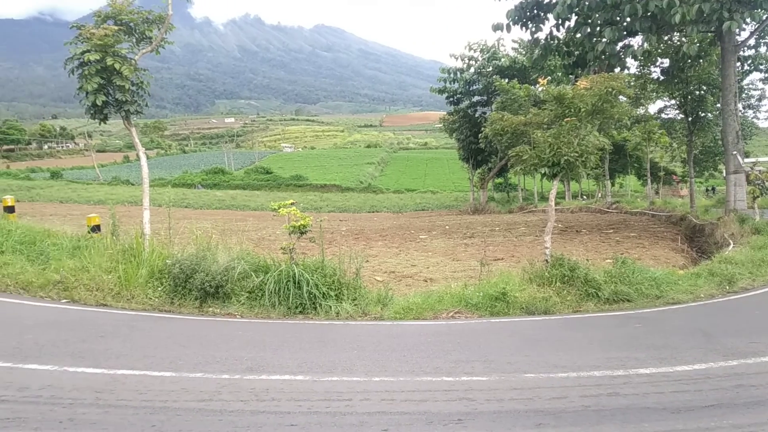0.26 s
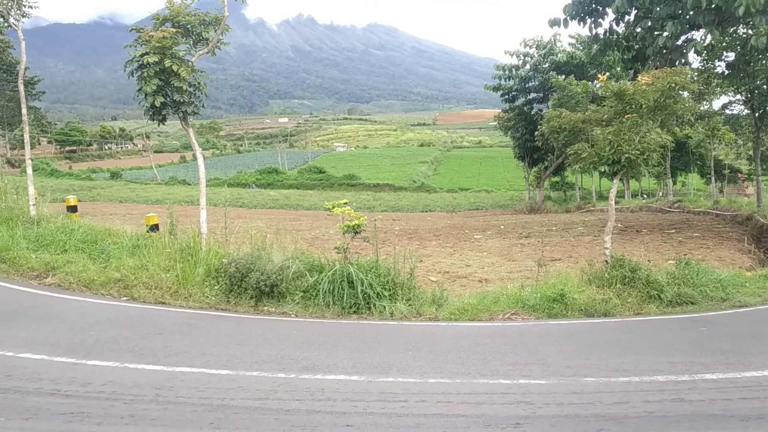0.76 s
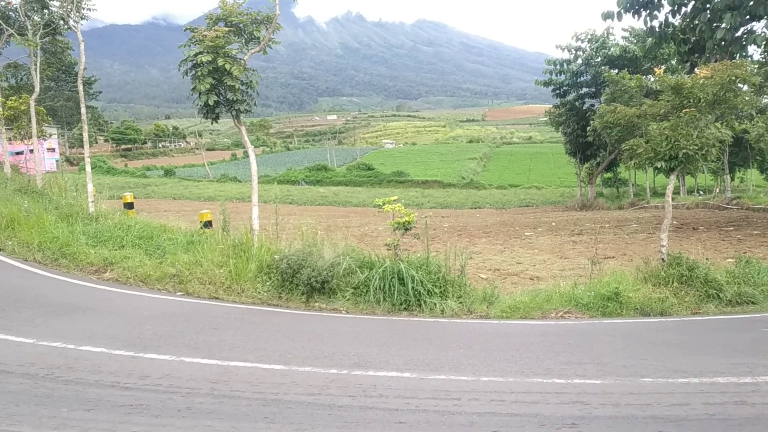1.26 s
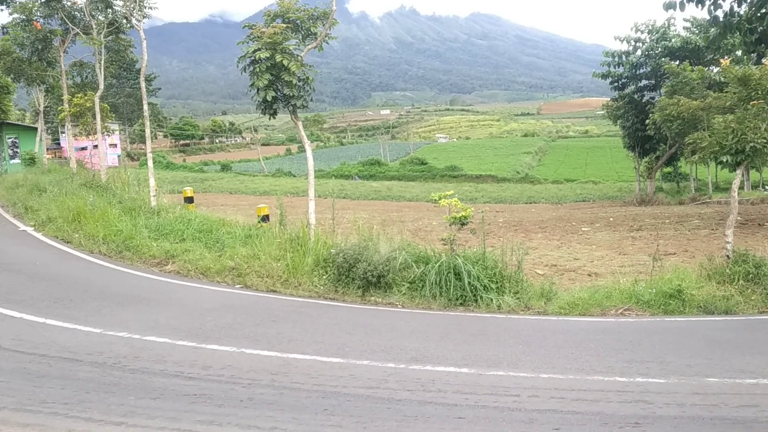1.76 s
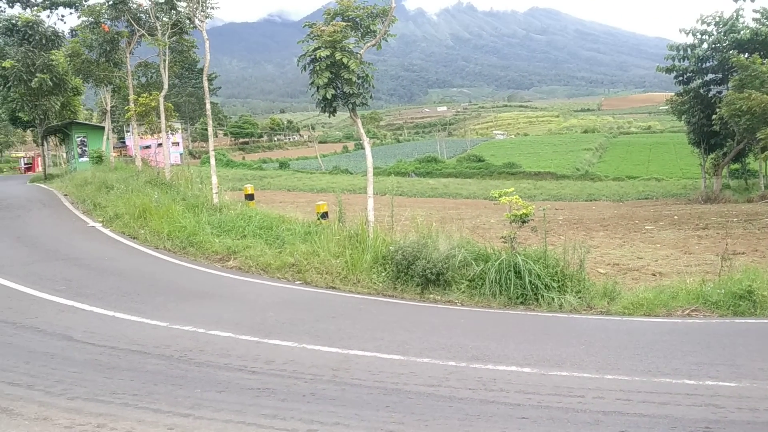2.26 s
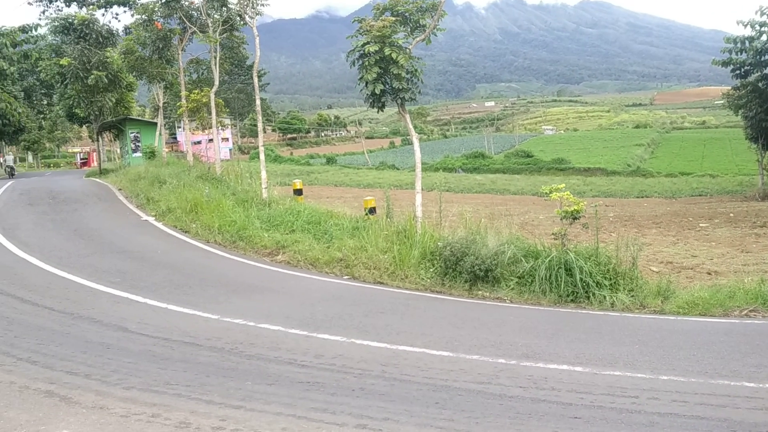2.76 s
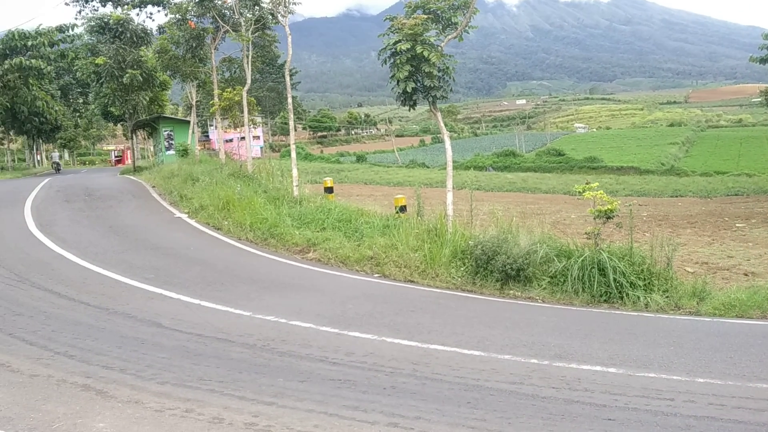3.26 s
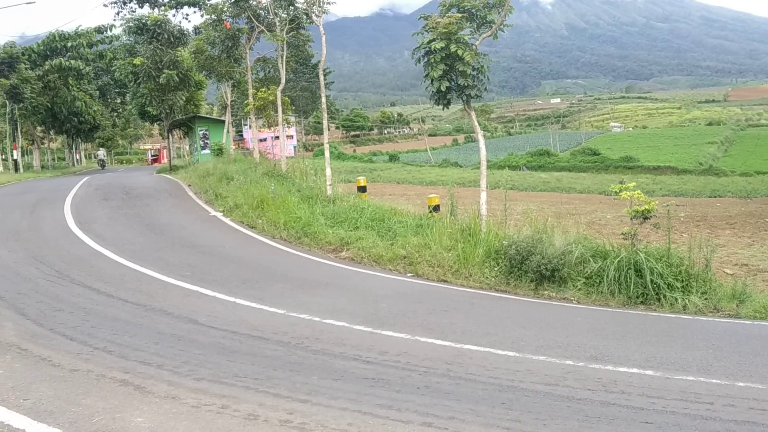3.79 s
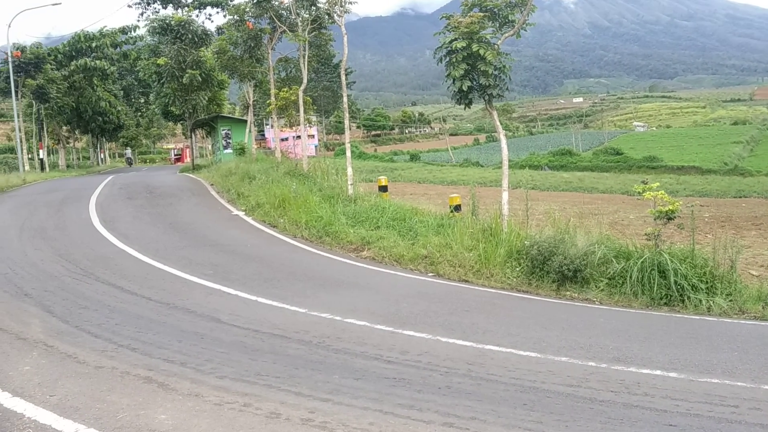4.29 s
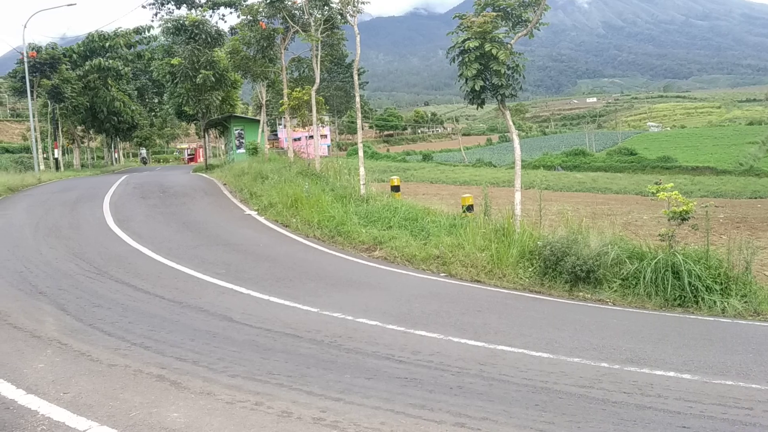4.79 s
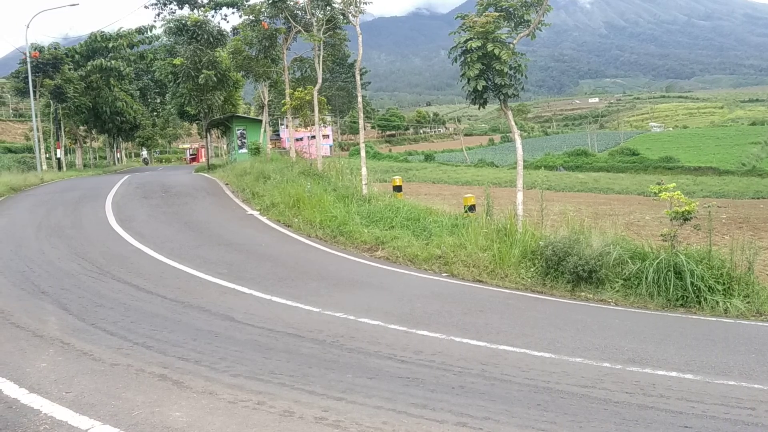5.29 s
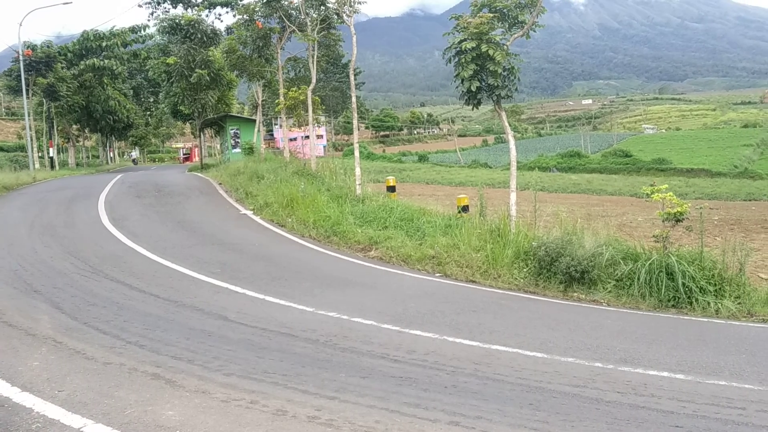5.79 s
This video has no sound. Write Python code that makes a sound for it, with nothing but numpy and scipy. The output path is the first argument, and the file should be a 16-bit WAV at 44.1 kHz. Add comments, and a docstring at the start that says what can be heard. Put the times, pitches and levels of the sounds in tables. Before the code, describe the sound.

A single-cylinder motorcycle putters away along a country road and fades, with light wind on the microphone and a bird chirping.

```python
"""A single-cylinder motorcycle has just passed on a country road. Every firing thumps through the
silencer, rings the tailpipe and spits a sharp crack of gas. Tyres and chain hiss, and a light breeze
rumbles on the microphone. The bike pulls gently away round a bend, its sharpest sounds fading first.
From about 2.4 s a bird in the roadside trees peeps twice, then sings its short phrase twice."""
import sys
import numpy as np
from scipy import signal
from scipy.fft import rfft, irfft
from scipy.io import wavfile
from scipy.ndimage import uniform_filter1d

SR = 44100
rng = np.random.default_rng(int(sys.argv[2]) if len(sys.argv) > 2 else 0)


def store_wav(level_fs):
    """Save 16-bit WAV to argv[1]."""
    pcm = np.round(np.clip(np.atleast_2d(level_fs), -1, 1) * 32767)
    wavfile.write(sys.argv[1], SR, pcm.T.astype(np.int16))


N = 266364
TIME_S = np.arange(N) / SR
SPECTRUM_HZ = np.maximum(np.arange(N // 2 + 1) * SR / N, 1)


def from_db(db):
    """Turn decibels into a number to multiply by."""
    return 10 ** (np.asarray(db) / 20)

def over_time(points):
    """Join (time_s, value) points with straight lines, one value per sample."""
    return np.interp(TIME_S, *np.transpose(points))

def over_pitch(points):
    """Join (pitch_hz, value) points across the spectrum, with octaves evenly spaced."""
    hz, values = np.transpose(points)
    return np.interp(np.log(SPECTRUM_HZ), np.log(hz), values)

def swell(peak_s, half_s):
    """A bell-shaped rise and fall of height 1."""
    return np.exp(-((TIME_S - peak_s) / half_s) ** 2)

def drift(rate_hz):
    """A smooth random wander, typically about 1 either side of zero."""
    step = 40  # samples between random points
    r = np.exp(-2 * np.pi * step * rate_hz / SR)
    slow = signal.lfilter([1], [1, -2 * r, r * r], rng.standard_normal(N // step + 2002))[2000:]
    return np.interp(np.arange(N) / step, np.arange(len(slow)), slow / slow.std())

def evened(x):
    """Hold the average level at 1, keeping the single pulses."""
    power = np.mean(np.atleast_2d(x) ** 2, axis=0)
    return x / np.sqrt(uniform_filter1d(uniform_filter1d(power, SR // 4), SR // 4) + 1e-20)

def coloured(spectrum, channels=2):
    """Separate noises at level 1, shaped by a spectrum and fading beyond its ends."""
    low_cut = np.minimum(SPECTRUM_HZ / spectrum[0][0], 1) ** 2
    high_cut = np.minimum(spectrum[-1][0] / SPECTRUM_HZ, 1) ** 2
    white = rfft(rng.standard_normal((channels, N)))
    noise = irfft(white * from_db(over_pitch(spectrum)) * low_cut * high_cut, N)
    return noise / noise.std()

def flickering(noise, depth_db, band_hz, count=5):
    """Neighbouring bands of pitch flicker separately, so the noise keeps changing colour."""
    band = (SPECTRUM_HZ // band_hz).astype(int) % count
    spectrum = rfft(noise)
    return sum(irfft(spectrum * (band == k), N) * from_db(depth_db * drift(37)) for k in range(count))

def delayed(x, seconds):
    """The same sound, arriving later."""
    return np.interp(np.arange(N) - seconds * SR, np.arange(N), x, left=0)

def stereo(x, lead_s, left_db):
    """Place a sound: it arrives lead_s sooner on the right and left_db louder on the left."""
    left = delayed(x, lead_s / 2) * from_db(left_db / 2)
    right = delayed(x, -lead_s / 2) * from_db(-left_db / 2)
    return np.array([left, right])

# How much sooner the bike's hiss and gas noise arrive on the right: time_s, lead_ms
RIGHT_LEAD = [(0, .48), (1.3, .45), (3.2, .33), (6.04, .31)]

def from_bike(x, left_db):
    """Make a sound come from the moving bike."""
    return stereo(x, over_time(RIGHT_LEAD) / 1000, left_db)

# How alike left and right are for sound from all round: pitch_hz, likeness (0 to 1)
STEREO_LIKENESS = [(100, 0.72), (300, 0.99), (650, 0.47), (1400, 0), (16000, 0)]

def all_round(pair):
    """Long, low waves reach left and right alike; short, high ones do not."""
    alike = np.clip(over_pitch(STEREO_LIKENESS), 0, 1)
    mid, side = rfft(pair)
    return irfft(np.sqrt((1 + alike) / 2) * mid + np.sqrt((1 - alike) / 2) * side * [[1], [-1]], N)

def countryside(x, fade_s):
    """Trees and banks scatter a thin, dull echo that drops 60 dB in fade_s."""
    age = np.arange(SR // 2) / SR
    scatter = rng.standard_normal((2, len(age))) * from_db(-60 * age / fade_s)
    scatter *= 1 - np.exp(-age / 0.0028)
    scatter /= np.sqrt(np.sum(scatter[0] ** 2))
    scatter = signal.sosfilt(signal.butter(1, 5000, fs=SR, output="sos"), scatter)
    return all_round(signal.fftconvolve(x, scatter, axes=1)[:, :N])

CLOSEST_M, SPEED_M_PER_S = 12.25, 9.2
DISTANCE_M = np.hypot(CLOSEST_M, SPEED_M_PER_S * TIME_S)

def receding(near_db, doubling_db, facing_db, facing_s):
    """A part fades with each doubling of distance, and swells as the bend turns it towards us."""
    doublings = np.log2(DISTANCE_M / CLOSEST_M)
    return from_db(near_db - doubling_db * doublings + facing_db * swell(facing_s, half_s=0.94))

# The bike turning its tail to us: time_s, share (0 = side on, 1 = from behind)
TAIL_TURN = [(0, 0), (1.7, 0.06), (2.8, 0.28), (3.3, 0.78), (3.9, 0.77), (4.6, 0.76), (6.04, 0.98)]

def turned():
    """How far the bike has turned away at each sample."""
    return np.clip(over_time(TAIL_TURN), 0, 1)

# The engine slowly speeding up: time_s, firings_per_s
ENGINE_SPEED = [(0, 30.17), (.33, 30.75), (.66, 31.13), (.995, 31.759), (1.758, 32.879), (2.969, 35.083),
                (3.473, 35.405), (4.742, 35.725), (5.649, 36.495), (6.04, 37.124)]

def firings(first_s, jitter_s):
    """The samples at which the exhaust valve opens, each a touch early or late."""
    cycles = np.cumsum(over_time(ENGINE_SPEED)) / SR
    cycles -= cycles[round(first_s * SR)]
    at = np.nonzero(np.diff(np.floor(cycles)))[0]
    jitter = np.round(rng.normal(0, 1, len(at)) * jitter_s * SR).astype(int)
    return np.clip(at + jitter, 0, N - 1)

def ringing(tones, at, force_db, uneven_db):
    """Each firing rings all the tones (wide ones die sooner); their balance shifts as the bike turns."""
    behind, out = turned()[at], np.zeros(N)
    for hz, width_hz, sign, side_db, behind_db in tones:
        heard = (1 - behind) * from_db(side_db) + behind * from_db(behind_db)
        pushes = np.zeros(N)
        pushes[at] = np.sign(sign) * heard * from_db(force_db + uneven_db * rng.standard_normal(len(at)))
        decay, angle = np.exp(-np.pi * width_hz / SR), 2 * np.pi * hz / SR
        out += signal.lfilter([0, np.sin(angle)], [1, -2 * decay * np.cos(angle), decay ** 2], pushes)
    return evened(out)

# Tones of the silencer's chambers: pitch_hz, width_hz, sign (push or pull), side_db, behind_db
SILENCER_TONES = [(114.4, 66.5, -1, -15.5, -39), (211.8, 49.4, 1, -11.5, -21), (230.5, 28.5, 1, -29, -14),
                  (244.7, 34, -1, -21.5, -31.5), (309.2, 31.7, 1, -21, -28.5), (334, 31, 1, -37, -47),
                  (371, 66, -1, -28.5, -33), (508, 48, -1, -34.5, -59)]

def silencer_thump(at, force):
    """The chambers boom; the road bank adds a dull echo that follows ever closer as the bike leaves."""
    thump = ringing(SILENCER_TONES, at, 0.43 * force, uneven_db=0.23)
    echo = delayed(thump, seconds=0.01482 * CLOSEST_M / DISTANCE_M)
    echo = signal.sosfilt(signal.butter(2, 420, fs=SR, output="sos"), echo)
    thump = evened(thump + 0.4 * swell(3.14, half_s=0.92) * echo)
    thump *= receding(near_db=-20.5, doubling_db=4.0, facing_db=2.0, facing_s=4.1)
    return stereo(thump, lead_s=0.00006, left_db=-1.5)

# Tones of the tailpipe: pitch_hz, width_hz, sign (push or pull), side_db, behind_db
TAILPIPE_TONES = [(636, 41.4, -1, -39.5, -36), (821, 180, 1, -53, -32.5), (884, 94, -1, -24.5, -20.5),
                  (965, 42, -1, -34.5, -42), (1077, 81, 1, -32.5, -37), (1327, 60, 1, -48, -40)]
# Their echoes off the bank and trees: delay_s, level_db
BARK_ECHOES = [(.0078, -36), (0.0205, -14)]

def tailpipe_bark(at, force, hard_db):
    """The pipe rings just after each thump, a little louder when the engine fires softly."""
    bark = delayed(ringing(TAILPIPE_TONES, at, 0.11 * force, uneven_db=1.4), seconds=0.00097)
    bark = evened(bark + sum(from_db(db) * delayed(bark, s) for s, db in BARK_ECHOES))
    bark *= receding(near_db=-39.5, doubling_db=2.5, facing_db=1.5, facing_s=3.96)
    alongside_db = -6 * swell(0, half_s=0.42)  # at first the pipe points past us
    return stereo(bark * from_db(alongside_db - 0.15 * hard_db), lead_s=0.000096, left_db=1.5)

def gas_bursts(spectrum, at, force_db, late_s, rise_s, snap_s, tail_s, tail_db, left_db):
    """A snap of rushing gas straight from the pipe, then a tail scattered off the road and verge."""
    pushes, age = np.zeros(N), np.arange(SR // 20) / SR
    pushes[at] = from_db(force_db)
    opening = (1 + np.tanh((age - late_s) / rise_s)) / 2
    open_s = np.maximum(age - late_s, 0)
    snap = signal.fftconvolve(pushes, opening * np.exp(-open_s / snap_s))[:N]
    tail = signal.fftconvolve(pushes, opening * np.exp(-open_s / tail_s))[:N] * from_db(tail_db)
    side = coloured([(hz, db) for hz, db, _ in spectrum], channels=3)
    behind = coloured([(hz, db) for hz, _, db in spectrum], channels=3)
    turn = turned()
    noise = flickering(np.sqrt(1 - turn) * side + np.sqrt(turn) * behind, depth_db=3.0, band_hz=1100)
    # half of the tail comes from the bike's direction, half from all round
    pair = from_bike(np.hypot(snap, tail) * noise[0], left_db=-1) + tail * noise[1:]
    balance_db = left_db * (1 - 1.4 * turn)  # slides from left to right
    return evened(pair * from_db([balance_db / 2, -balance_db / 2]))

# Colour of the gas noise in each firing: pitch_hz, side_db, behind_db
RASP_COLOUR = [(490, -9, -12), (960, 9, 3), (1580, -7, 10), (1780, -13, 9.5), (2077, 5.5, -7),
               (3080, -2.5, -2.5), (3310, 0, 9), (3540, -2, -19), (3900, -1, 8), (4320, -5.5, 1),
               (4230, 3.5, 2), (5180, -9, 1), (7000, -16, -6.5)]

def gas_rasp(at, force, hard_db):
    """Each firing blows out a rough puff, a little louder when the engine fires hard."""
    rasp = gas_bursts(RASP_COLOUR, at, 0.44 * force, late_s=0.0013, rise_s=0.00048,
                      snap_s=0.0013, tail_s=0.0068, tail_db=-9.5, left_db=1.6)
    rasp *= receding(near_db=-34.0, doubling_db=9.0, facing_db=7.0, facing_s=4.23)
    return rasp * from_db(0.16 * hard_db)

# Colour of the sharp edge of each firing: pitch_hz, side_db, behind_db
CRACK_COLOUR = [(3000, -53, -18), (4870, -15.5, -4), (6320, 2.5, -4.5), (8050, 2, 9), (8300, 1.5, -25),
                (10300, 3.5, 4), (12200, -6, -10.5), (14300, -6, -32), (15700, -18, -30)]

def gas_crack(at, force, hard_db):
    """The sudden jet of gas makes a bright crack that fades fast with distance."""
    crack = gas_bursts(CRACK_COLOUR, at, 0.38 * force, late_s=0.0014, rise_s=0.00012,
                       snap_s=0.0003, tail_s=0.0029, tail_db=20, left_db=4.5)
    crack *= receding(near_db=-27.0, doubling_db=14.0, facing_db=5.5, facing_s=3.73)
    return crack * from_db(hard_db)

# Spells of harder (+) or softer (-) firing: time_s, crack_change_db
FIRING_SPELLS = [(.14, 0.5), (.42, -3.5), (1.17, -3), (1.65, -2.5), (2.42, 2.5), (2.9, -4), (4.1, -11.5),
                 (4.62, 4), (5.25, -8)]

def exhaust():
    """The same firings drive thump, bark, rasp and crack; a few spits and a faint echo join them."""
    hard_db = sum(db * swell(s, half_s=0.16) for s, db in FIRING_SPELLS)
    at = firings(first_s=0.0096, jitter_s=0.00008)
    force = rng.standard_normal(len(at))  # no two firings are equally strong
    direct = silencer_thump(at, force) + tailpipe_bark(at, force, hard_db)
    direct += gas_rasp(at, force, hard_db) + gas_crack(at, force, hard_db)
    direct += gas_spits(width_hz=360, fall_s=0.00076)
    return direct + from_db(-17) * countryside(direct, fade_s=0.4)

# Colour of the chain and tread noise: pitch_hz, level_db
HISS_COLOUR = [(3500, -57), (5300, -20), (6500, 3.5), (8400, 4), (10800, 2), (12500, -13), (15000, -37)]

def chain_hiss():
    """The chain and tyre tread make a high, flickering hiss."""
    noise = flickering(coloured(HISS_COLOUR, channels=3), depth_db=3.5, band_hz=700)
    hiss = evened(from_bike(noise[0], left_db=12.5) + noise[1:]) * from_db(0.78 * drift(17))
    return hiss * receding(near_db=-36.5, doubling_db=8.5, facing_db=2.5, facing_s=3.3)

# Colour of the rolling tyres: pitch_hz, level_db
ROAR_COLOUR = [(100, 8.5), (300, 12), (550, 7.5), (900, 10.5), (1500, 2.5), (2250, 8), (3200, 2),
               (4500, 1.5), (6000, 0.5), (9000, -9.5)]

def tyre_roar():
    """Tyres on asphalt make a broad, uneven roar."""
    roar = from_db(2.5 * drift(26.6)) * all_round(coloured(ROAR_COLOUR))
    return roar * receding(near_db=-39.5, doubling_db=4.0, facing_db=3.5, facing_s=3.3)

# Colour of the breeze: pitch_hz, level_db
BREEZE_COLOUR = [(12, -4), (40, -3.5), (80, -5), (150, -9), (300, -15), (600, -31.5), (1500, -78)]
# Its rise and fall: time_s, level_db
BREEZE_LEVEL = [(0, -22), (1.0, -28), (2.3, -30.5), (2.7, -35), (3.6, -33), (4.0, -45.5), (5.3, -42),
                (6.04, -27.5)]

def breeze():
    """Air on the microphone makes a lumpy rumble, only partly shared by left and right."""
    air = coloured(BREEZE_COLOUR, channels=3)
    rumble = evened(0.44 * air[0] + 1.03 * air[1:])
    return rumble * from_db(over_time(BREEZE_LEVEL) + 2.0 * drift(6.4))

# The sharpest spits of gas: start_s, peak_db, pitch_hz
GAS_SPITS = [(0.078, -8, 6800), (0.1755, -9.5, 10300), (0.241, -5.5, 11900), (0.2737, -6.5, 7000),
             (0.4377, -12, 5640), (0.5656, -16, 7240), (0.6305, -16, 4670), (0.7267, -12, 8850),
             (0.7604, -4, 7650), (4.063, -32, 3900)]

def gas_spits(width_hz, fall_s):
    """Now and then the exhaust jet chirps for a moment at one pitch."""
    out, age = np.zeros(N), np.arange(SR // 50) / SR
    for start_s, db, hz in GAS_SPITS:
        puff = rng.standard_normal(len(age)) * np.exp(-age / fall_s)
        ring = signal.lfilter(*signal.iirpeak(hz, hz / width_hz, fs=SR), puff)
        first = int(start_s * SR)
        out[first:first + len(age)] += from_db(db) * ring / np.abs(ring).max()
    return from_bike(out, left_db=4)

# Short puffs of wind: peak_s, half_length_s, level_db
WIND_PUFFS = [(0.832, 0.04, -21), (5.896, 0.044, -30.5)]
# Their colour: pitch_hz, level_db
PUFF_COLOUR = [(60, -6), (160, 14), (320, -30), (600, -14), (1200, -25)]

def wind_puffs():
    """Air bumps the microphone briefly, higher in pitch than the rumble."""
    push = sum(from_db(db) * swell(s, half_s) for s, half_s, db in WIND_PUFFS)
    return push * coloured(PUFF_COLOUR)

# Single peeps before the song: start_s, level_db
BIRD_PEEPS = [(2.41, -43.5), (2.645, -48)]
# Notes of the phrase: after_s, length_s, start_hz, middle_hz, end_hz, level_db
BIRD_PHRASE = [(0, 0.036, 3220, 3720, 3180, -6), (0.12, 0.0306, 3340, 3000, 2780, -8.5),
               (0.201, .056, 2500, 2620, 2130, -2), (.255, 0.059, 2106, 2250, 2130, -8.5)]
# Each time it is sung: start_s, level_db, stretch (above 1 is slower)
BIRD_SONGS = [(3.68, -40.5, .94), (5.701, -42.5, 1.02)]

def bird():
    """Two peeps, then one phrase twice: short sliding whistles with a rough edge, blurred by trees."""
    peep_s, peep_hz = 0.032, (2380, 2325, 2270)
    notes = [(s, peep_s, *peep_hz, db) for s, db in BIRD_PEEPS]
    for start_s, song_db, stretch in BIRD_SONGS:
        for after_s, length_s, *slide_hz, db in BIRD_PHRASE:
            notes.append((start_s + stretch * after_s, stretch * length_s, *slide_hz, song_db + db))
    song, waver = np.zeros(N), drift(210)
    for start_s, length_s, *slide_hz, db in notes:
        progress, first = np.linspace(0, 1, int(length_s * SR)), min(int(start_s * SR), N)
        hz = np.polyval(np.polyfit([0, 0.5, 1], slide_hz, 2), progress)  # a curve through three pitches
        hz *= 1 + 0.03 * np.roll(waver, -first)[:len(hz)]
        note = from_db(db) * np.sin(np.pi * progress) * np.sin(2 * np.pi * np.cumsum(hz) / SR)
        song[first:first + len(note)] += note[:N - first]
    song = stereo(song * from_db(2.0 + 4.1 * drift(120)), lead_s=0, left_db=-2)
    return song + from_db(1.5) * countryside(song, fade_s=0.34)

def scene():
    """Bike, wind and bird together."""
    return exhaust() + chain_hiss() + tyre_roar() + breeze() + wind_puffs() + bird()

def record(dry):
    """Cut the rumble below 12 Hz and the treble above 16000 Hz."""
    dry = signal.sosfilt(signal.butter(1, 12, "high", fs=SR, output="sos"), dry)
    return signal.sosfilt(signal.ellip(10, 0.2, 80, 16000, fs=SR, output="sos"), dry)


dry = scene()
out = record(dry)
store_wav(out)
```